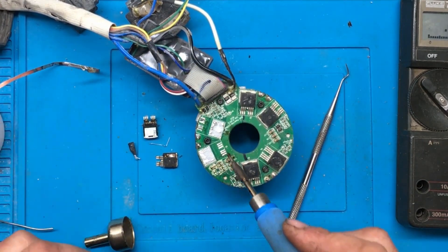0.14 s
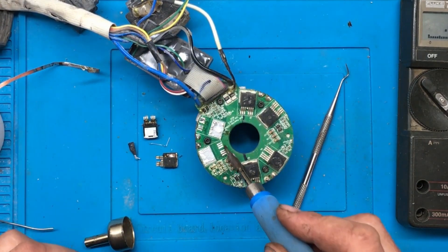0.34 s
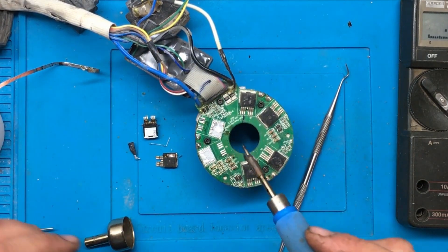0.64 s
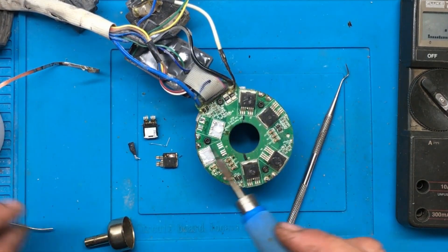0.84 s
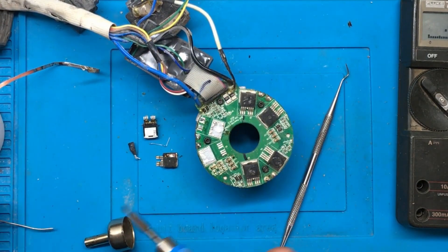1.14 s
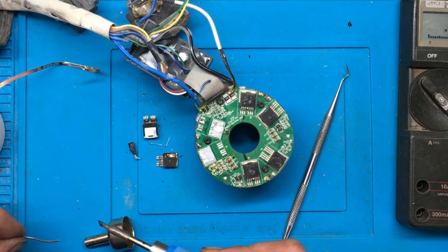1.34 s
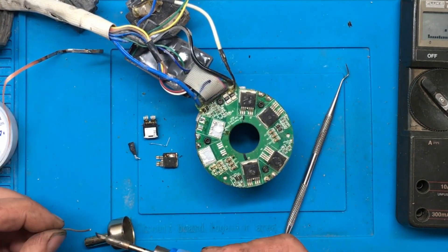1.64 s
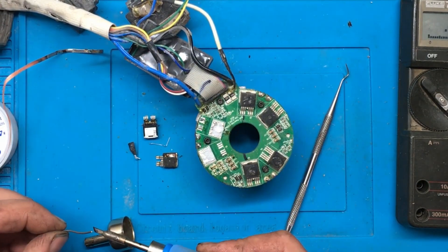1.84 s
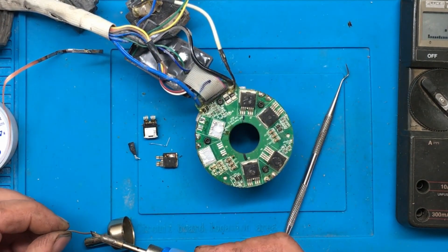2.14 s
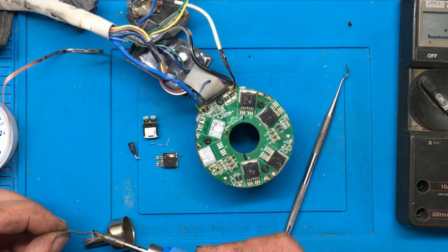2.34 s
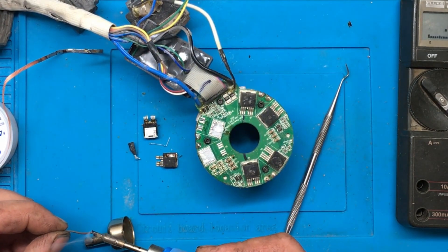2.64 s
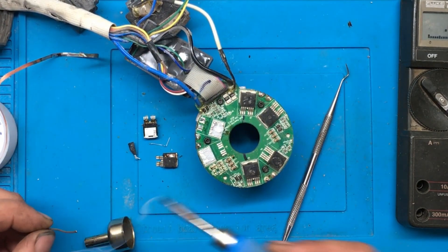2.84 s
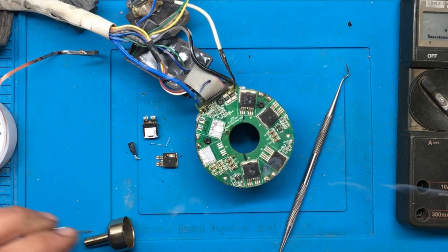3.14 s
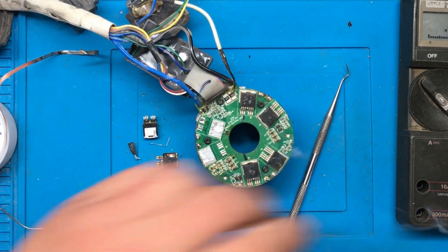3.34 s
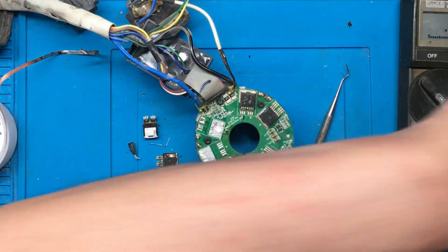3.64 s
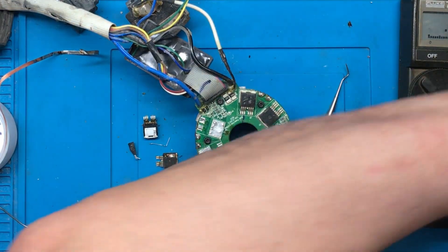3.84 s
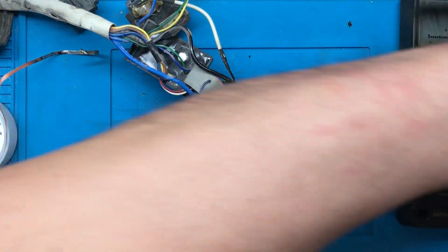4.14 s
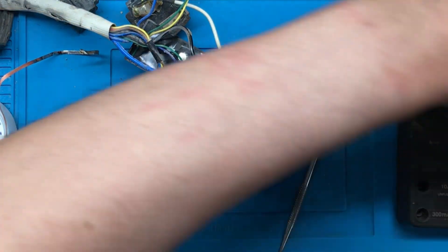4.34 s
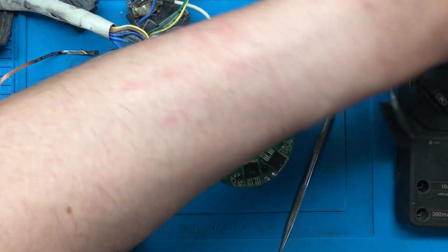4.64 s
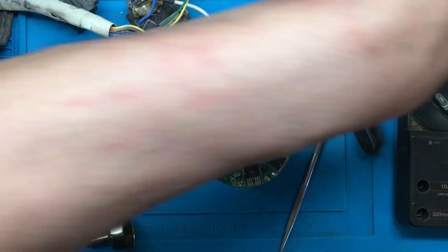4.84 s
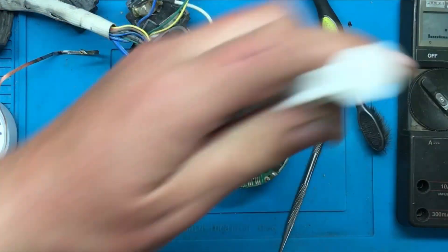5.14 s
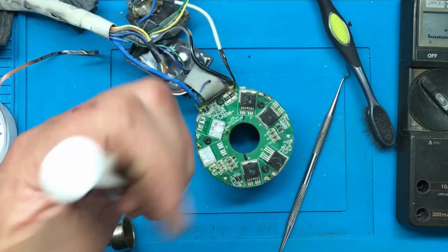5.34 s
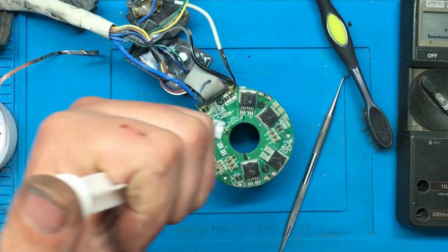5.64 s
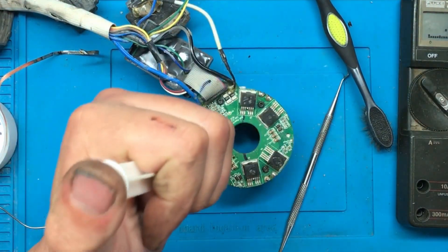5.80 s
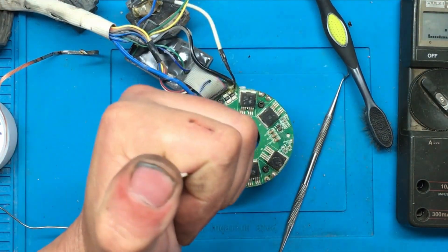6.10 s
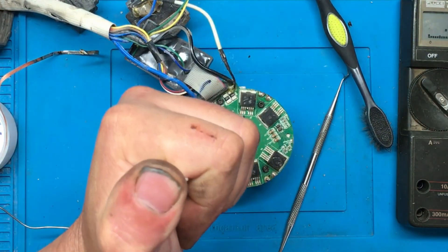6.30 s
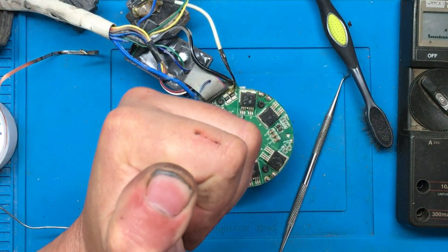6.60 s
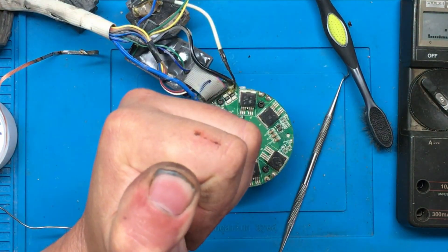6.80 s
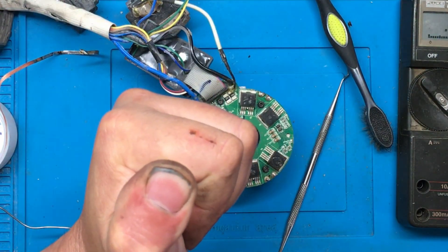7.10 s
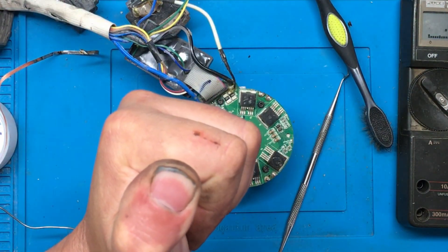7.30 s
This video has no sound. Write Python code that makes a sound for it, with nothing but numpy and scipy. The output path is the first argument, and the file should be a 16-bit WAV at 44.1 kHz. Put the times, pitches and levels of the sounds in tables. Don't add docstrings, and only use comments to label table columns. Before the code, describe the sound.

A small quiet room holds a faint low hum and soft hiss, with tiny flickering losses of treble. Around 1.3 to 1.6 seconds, faint muted metal taps and a light scrape come from a holder; another barely heard tick follows near 2.1. At 2.9 to 3.1 an iron touches metal and drops in with a crisp double clink. At 3.85 a small tool is picked up in a bright, quick clatter. From 4.0 to 4.35 loose plastic parts jostle lightly. A snap at 4.5 leads to the loudest hard crack at 4.56, a clack at 4.67 and hollow knocks around 4.85 to 4.95, with bench thumps and skin or plastic sliding over the mat. At 5.24 to 5.4 a brush lands and rattles woodily. Faint thin squeaks last to 6.4, then tiny clicks until 7.1. Close microphone, short echoes.

```python
import sys
import numpy as np
from scipy import signal
from scipy.io import wavfile
from scipy.ndimage import uniform_filter1d

SR = 44100
rng = np.random.default_rng(int(sys.argv[2]) if len(sys.argv) > 2 else 0)


def unload_wav(signal):
    wavfile.write(
        sys.argv[1],
        SR,
        np.round(np.clip(np.atleast_2d(signal).T, -1, 1) * 32767).astype(np.int16),
    )


def voltage_ratio(level):
    return 10 ** (np.asarray(level, float) / 20)


N = 328986


def evened(x):
    return x / np.sqrt(np.mean(x ** 2) + 1e-20)


def peaked(x):
    return x / abs(x).max()


def read(points, hz):
    f, value = np.transpose(points)
    return np.interp(np.log(hz + 1), np.log(f + 1), value)


def add(mix, s, sound):
    part = mix[round(s * SR):][:len(sound)]
    part += sound[:len(part)]


def coloured(x, colour):
    hz = abs(np.fft.fftfreq(4096, 1 / SR))
    log_gain = np.log(voltage_ratio(np.maximum(colour(hz), -100)))
    taps = np.fft.ifft(np.exp(np.conj(signal.hilbert(log_gain)))).real[:1024]
    return signal.oaconvolve(x, taps)[:len(x)]


def resonate(x, hz, width):
    turn = np.exp(2j * np.pi * np.cumsum(hz * np.ones(len(x))) / SR)
    r = np.exp(-np.pi * width / SR)
    return 2 * (turn * signal.lfilter([1 - r], [1, -r], x / turn)).real


def narrow_noise(hz, width):
    return evened(resonate(rng.standard_normal(N), hz, width))


def ringing(modes, strike, cycles, size):
    hz, db, t60 = np.transpose(modes)[:, :, None]
    t = np.arange(size) / SR
    fall_db = 60 * t / np.clip(t60, .005, cycles / hz)
    return (voltage_ratio(db + strike[:len(hz), None] - fall_db) * np.sin(2 * np.pi * hz * t)).sum(0)


def contact(contact_ms, rise_ms):
    t = np.arange(4000) / SR
    fade = np.exp(-t * 1000 / contact_ms * 2) + 0.23 * np.exp(-t / 0.00024)
    push = rng.standard_normal(4000) * fade * np.minimum(t * 1000 / rise_ms, 1)
    chance = uniform_filter1d(abs(np.fft.fft(push, 4096)) ** 2, size=15, mode="wrap")
    even_share = .85
    return coloured(push, lambda hz: -even_share * 10 * np.log10(chance / chance.mean() + .03))


# pitch in Hz, level in dB, t60 in seconds.
BENCH_MODES = [(77, -10.5, 0.33), (147.7, 2, 0.098), (269, -6.5, 0.17), (359.4, -3.5, 0.052),
               (418.6, -4.5, 0.16), (592, -12, .08), (636, -10.5, .07), (818, -6.5, .06)]


def bench_boom():
    soft_start = np.minimum(np.arange(9000) / 150, 1)
    return peaked(ringing(BENCH_MODES, 3 * rng.standard_normal(12), cycles=37.0, size=9000) * soft_start)


def knocks(rows, body, contact_ms, rise_ms):
    out, t = np.zeros(N), np.arange(4000) / SR
    colour, modes = body
    treble = signal.butter(3, 5000, "high", fs=SR, output="sos")
    middle = signal.butter(4, 5300, fs=SR, output="sos")
    for s, knock_db, tick_db, boom_db, hz in rows:
        push = contact(contact_ms, rise_ms)
        modes_ring = ringing(modes, 1.5 * rng.standard_normal(12), cycles=40., size=4000)
        rings = signal.oaconvolve(push, modes_ring)[:4000]
        crack = coloured(push, lambda f: read(colour, f))
        sound = peaked(crack) + 0.33 * peaked(rings)
        tick = signal.sosfilt(treble, sound)
        pitched = peaked(resonate(push, hz, 0.15 * hz))
        knock = signal.sosfilt(middle, peaked(sound - tick) + 0.6 * pitched)
        tick = tick * (0.39 + np.exp(-t / 0.0026))
        add(out, s, voltage_ratio(knock_db) * peaked(knock) + voltage_ratio(tick_db) * peaked(tick))
        add(out, s, voltage_ratio(boom_db) * bench_boom())
    return out


# start in seconds, knock in dB, treble tick in dB,
# bench boom in dB, knock pitch in Hz. All blow tables below have these columns.
HOLDER_BLOWS = [(1.3013, -35.5, -45, -44, 1630), (1.3693, -35, -49, -44.5, 1670),
                (1.4178, -37, -46, -50, 1440), (1.4302, -29, -24, -56, 3300), (1.4984, -51, -49, -69, 1650),
                (1.522, -60, -54, -75, 4300), (1.5398, -52, -55, -50, 3460), (1.5618, -46, -49, -57, 3400),
                (2.0934, -59, -47.5, -74, 4927)]
# crack colour (Hz, dB), then ringing modes (Hz, dB, t60 in seconds). All bodies below are alike.
HOLDER_BODY = [(350, -15), (600, -28), (1420, 0), (6520, -17), (7590, -20), (9740, -18.5), (14200, -23),
               (16500, -36)], [(2400, -10, 5.0), (3600, -24, 5.0), (6660, -7, 0.088), (9100, 3, 0.72)]
# (s, dB, dB, dB, Hz).
TOUCH_BLOWS = [(2.9261, -27, -20, -46.5, 3300), (2.939, -35, -50, -57, 3300),
               (3.0636, -39.5, -48, -49, 4170), (3.0745, -51, -56, -62, 3600)]
# (Hz, dB, s).
TOUCH_BODY = ([(290, -40), (800, -13), (1350, 10), (2100, -9), (3300, -6), (4700, -15), (5700, -6.5),
              (7000, -21), (16500, -32)], [(1300, -8, .03), (2560, -10, .03), (3320, -3, .05),
              (4420, -7, .03), (5660, -1, .03), (6966, -12, .03)])
# (s, dB, dB, dB, Hz).
IRON_BLOWS = [
    (3.0863, -17, -14.5, -36, 4000),
    (3.0888, -21, -32, -52, 1300),
    (3.0994, -22, -42, -51, 3160),
    (3.6563, -65, -57, -56, 850),
]
# (Hz, dB, s).
IRON_BODY = ([(290, -61), (600, -22), (980, -11), (1350, 5), (2000, -12), (3200, -10), (4400, -11.5),
             (5900, -15.5), (7400, -22), (10000, -28), (15100, -48), (16500, -46)], [(1500.4, -24, .05),
             (3200, -15, .04), (5400, -2, .02), (6000, 3, .04), (1300, 2, .05), (3080, -10, .04),
             (7504, -8, .03)])
# (s, dB, dB, dB, Hz).
PICK_BLOWS = [(3.8371, -47, -32, -65, 3254), (3.8427, -33.5, -24.5, -31.5, 1040),
              (3.8588, -21, -12, -27.5, 2380), (3.8651, -15, -21, -31.5, 1150),
              (3.8717, -16, -15, -66, 4350), (3.8777, -16.5, -16, -37, 620), (3.883, -22.5, -40, -36, 815),
              (3.9095, -37, -31, -58, 2400)]
# (Hz, dB, s).
PICK_BODY = [(180, -11), (300, 1), (1150, -7), (3140, 0), (3530, -16), (4390, -0.5), (4930, -20),
             (6560, -1), (14000, -24), (16500, -47)], [(950, 3, 5.0), (1200, 12.5, 0.18), (2470, 13, 0.08),
             (3080, 2, 0.08), (4500, 7, .08), (6470, 5, 0.071), (5750, -6.5, 0.1), (8086, 6, 0.092),
             (8603, 9, .08), (9000, 12, 0.056)]
# (s, dB, dB, dB, Hz).
PARTS_BLOWS = [(4.0152, -35, -25, -53, 1200), (4.0385, -31.5, -33, -39, 1200), (4.044, -33, -42, -50, 2950),
               (4.0732, -34.5, -38, -65, 2700), (4.0906, -34, -33, -39, 3400),
               (4.1411, -48, -39.5, -55, 1910), (4.1742, -57, -51, -68, 3500),
               (4.2009, -37, -42, -50.5, 1158), (4.2149, -41, -40, -54, 3200),
               (4.2268, -37, -40, -44, 1464), (4.2466, -34, -32.5, -77, 3140),
               (4.2595, -38, -36, -54, 3220), (4.274, -47.5, -34.5, -43, 945),
               (4.282, -49.5, -36.5, -59, 1890), (4.3053, -52.5, -38, -52.5, 860),
               (4.3262, -47.5, -51, -68, 3826)]
# (Hz, dB, s).
PARTS_BODY = [(180, -33.5), (300, -20.5), (531, -8.5), (1000, 3.5), (2060, -13.5), (3360, -4.5),
              (4900, -29), (5600, -19), (7600, -20), (9650, -20.5), (12300, -20), (15200, -26),
              (16500, -51.5)], [(3140, -4, 0.06), (5600, -3, 0.073), (7600, -6, 0.02), (12200, -3, 0.012)]
# (s, dB, dB, dB, Hz).
SNAP_BLOWS = [(4.4146, -48, -57, -48.5, 1779), (4.4878, -23.5, -19, -36.5, 2007),
              (4.4915, -23.5, -28, -50, 3750), (4.5131, -32.5, -41, -47.5, 2882)]
# (Hz, dB, s).
SNAP_BODY = [(290, -44.5), (500, -4), (1980, -0.5), (3070, -12.5), (3770, -6.5), (5120, -22), (12000, -18),
             (16500, -38)], [(3750, -4, .03), (11930, -4.5, .01)]
# (s, dB, dB, dB, Hz).
CAP_BLOWS = [
    (4.5429, -34, -55, -27, 501),
    (4.5528, -8, -45, -24, 1600),
    (4.5581, 3, -9, -27, 3050),
    (4.5635, -13, -30.5, -39, 1450),
    (4.5855, -24.5, -41, -42, 3050),
    (4.6449, -32, -48, -37.5, 2613),
]
# (Hz, dB, s).
CAP_BODY = [(180, -13), (400, -5.5), (800, -25.5), (1600, 1.5), (2200, -7), (3000, -7.5), (5200, -24),
            (14000, -25.5), (16500, -47)], [(1410, -5.5, .04), (1520, -6, .04), (1740, 1, .06),
            (2630, -5.5, .05), (3100, -2.5, .05), (4200, -9, .02)]
# (s, dB, dB, dB, Hz).
LID_BLOWS = [(4.6654, -6, -8, -27, 2028), (4.6684, -5, -25.5, -49, 1500), (4.683, -24, -36, -50.5, 3100),
             (4.7518, -31, -31, -26, 2910), (4.7555, -35.5, -32, -48, 4300)]
# (Hz, dB, s).
LID_BODY = [(300, -26), (700, -15.5), (1400, -3), (2100, 0.5), (3700, -7.5), (6000, -16.5), (9000, -20.5),
            (14000, -35), (16500, -48.5)], [(1500, -3, .03), (1930, 2, .05), (2630, -2.5, .03),
            (3112, -9, .04), (3700, -9, .03)]
# (s, dB, dB, dB, Hz).
TUBE_BLOWS = [(4.8485, -33, -41, -39, 1150), (4.855, -11.5, -4, -60, 2100),
              (4.8665, -14.5, -14, -25.5, 1087), (4.8824, -23, -38, -55, 1080),
              (4.9235, -21.5, -40, -26, 1980), (4.9538, -36, -23, -34.5, 1120),
              (4.9612, -36, -27, -77, 1020)]
# (Hz, dB, s).
TUBE_BODY = [(180, -32), (300, 9.5), (406, -33), (617, 3.5), (1430, -4), (1960, 0), (3970, -9.5),
             (8730, -8), (12400, -10), (16500, -35.5)], [(970, -10, 0.16), (2080, 9, 0.1),
             (3350, 10.5, 0.047), (5577, -34, 0.74), (7364, -22.5, 0.095)]
# (s, dB, dB, dB, Hz).
BRUSH_BLOWS = [(5.2428, -15, -22, -55, 2900), (5.2445, -9, -18.5, -24, 1920),
               (5.2487, -21.5, -42.5, -46, 804), (5.2567, -28, -50, -44, 614), (5.2717, -27, -48, -45, 700),
               (5.3121, -27, -49, -23.5, 3750), (5.3176, -16, -32.5, -47, 780),
               (5.3215, -21, -43, -52, 2400), (5.3325, -23, -40, -42, 1900),
               (5.3345, -15.5, -40, -20.5, 628), (5.3445, -28, -50, -47, 2300),
               (5.3608, -29, -49, -24.5, 605), (5.3929, -28.5, -50, -34, 604)]
# (Hz, dB, s).
BRUSH_BODY = [(180, -27), (300, -3), (531, -1.5), (800, -8.5), (1100, -17), (1900, -8), (3100, -14.5),
              (4930, -35.5), (13300, -38), (16500, -71.5)], [(400, -6, 0.1), (499, -11, .1), (570, -2, .1),
              (662, -19, .1), (850, -2, .07), (1940, 1, .02), (3100, -3, .03)]
# (s, dB, dB, dB, Hz).
PLUNGER_BLOWS = [(6.5176, -47, -52, -66, 1190), (6.5858, -50, -49, -55.5, 1157),
                 (6.542, -54, -59, -73.5, 1500), (6.5565, -55, -58.5, -75.5, 1094),
                 (6.611, -54, -59.5, -75, 3500), (6.638, -53, -60, -75, 1250), (6.661, -54, -64, -75, 1200),
                 (6.691, -53, -62, -75, 1200), (6.7218, -51, -56, -77, 3500), (6.7547, -54, -56, -81, 1210),
                 (6.8191, -50.5, -55.5, -71.5, 3570), (7.0556, -45, -49.5, -70.5, 3460)]
CONTACT_MS = {"holder": 8.6, "touch": 2.5, "iron": 3.2, "pick": 8.9, "parts": 5, "snap": 9.5, "cap": 4.5,
              "lid": 2.4, "tube": 4.1, "brush": 4.3, "plunger": 3.2}
RISE_MS = {"holder": 1.3, "touch": 0.55, "iron": 0.63, "pick": 0.29, "parts": 1.1, "snap": .5, "cap": 0.72,
           "lid": .4, "tube": .3, "brush": 0.86, "plunger": 0.62}
WET_DB = {"holder": -2, "touch": -1, "iron": -2, "pick": -2.8, "parts": -4, "snap": -0.5, "cap": -3.5,
          "lid": -3.5, "tube": 1.5, "brush": -2, "plunger": -3.5}


def handled_objects():
    objects = {
        "holder": (HOLDER_BLOWS, HOLDER_BODY), "touch": (TOUCH_BLOWS, TOUCH_BODY),
        "iron": (IRON_BLOWS, IRON_BODY), "pick": (PICK_BLOWS, PICK_BODY),
        "parts": (PARTS_BLOWS, PARTS_BODY), "snap": (SNAP_BLOWS, SNAP_BODY),
        "cap": (CAP_BLOWS, CAP_BODY), "lid": (LID_BLOWS, LID_BODY),
        "tube": (TUBE_BLOWS, TUBE_BODY), "brush": (BRUSH_BLOWS, BRUSH_BODY),
        "plunger": (PLUNGER_BLOWS, HOLDER_BODY)}
    blows = np.zeros((2, N))
    for name, (rows, body) in objects.items():
        blows += knocks(rows, body, CONTACT_MS[name], RISE_MS[name]) * voltage_ratio([[0], [WET_DB[name]]])
    no_bass = signal.butter(3, 105, "high", fs=SR, output="sos")
    return signal.sosfilt(no_bass, blows)


# start in seconds, pitch in
# Hz, level in dB, t60 in seconds.
THUDS = [(3.474, 1084, -41, 0.016), (8.1, 62, -42.5, 0.55), (7.33, 114, -40.5, 0.12),
         (1.6, 120, -47.5, 0.18), (1.378, 134, -38, 0.13), (1.441, 341, -38, 0.075), (5, 290, -31, 0.07),
         (4.766, 320, -38.5, 0.18), (4.035, 69, -47, .4), (4, 61, -55, 0.28), (4.555, 148, -22, .17),
         (4.556, 500, -27, .06), (4.556, 910, -28, .06), (4.684, 145, -30, .25), (4.762, 140, -32, .25),
         (5.246, 148, -20, .15), (5.243, 820, -25, .07), (5.316, 436, -24, .12), (5.318, 571, -24, .12),
         (5.34, 148, -31, .4), (5.243, 290, -25, .07), (4.925, 400, -33, .15)]


def thuds():
    out, t = np.zeros(N), np.arange(6000) / SR
    for s, hz, db, t60 in THUDS:
        tone = np.sin(2 * np.pi * hz * t) * np.minimum(t / 0.0027, 1)
        add(out, s, voltage_ratio(db - 60 * t / t60) * tone)
    return out


def mat_grain():
    lumps = evened(uniform_filter1d(rng.standard_normal(N), 60))
    fine, coarse = rng.standard_normal((2, N))
    return fine * voltage_ratio(1.5 * lumps), coarse * voltage_ratio(4 * lumps)


def stroke(start, length):
    press_share, lift_share, edge_db = 0.15, 0.42, -15
    u = np.arange(0, length, 1 / SR) / length
    lack = 1 - np.clip(np.minimum(u / press_share, (1 - u) / lift_share), 0, 1)
    ends = np.clip(np.minimum(u, 1 - u) * length / 0.013, 0, 1)
    first = round(start * SR)
    return slice(first, first + len(u)), voltage_ratio(edge_db * lack) * ends


# start and length in seconds, scrape in dB, rumble through the bench in dB.
PLASTIC_WIPES = [(1.311, 0.11, -59.5, -54), (1.397, 0.27, -60.5, -61), (3.878, 0.12, -60, -46.5),
                 (3.995, 0.18, -54.5, -52), (4.15, 0.26, -58.5, -59), (4.706, 0.11, -43.5, -40.5),
                 (4.754, 0.2, -51.5, -50), (4.93, 0.39, -59, -63), (5.235, 0.185, -50, -45),
                 (5.434, 0.22, -69, -60.5)]
# frequency in Hz, level in dB.
SCRAPE_COLOUR = [(410, -31.5), (700, -24), (1190, -2.5), (1320, -12), (2480, -9.5), (2720, -10.5),
                 (5000, -14), (6500, -37.5), (11000, -120)]
# frequency in Hz, level in dB.
RUMBLE_COLOUR = [(29, -48), (50, -15.5), (86, -8.5), (129, 15.5), (178, -4.5), (249, 4), (362, -0.5),
                 (591, -4.5), (800, -16.5), (1100, -26.5), (1430, -58.5), (2420, -120)]


def plastic_drags(coarse):
    out = np.zeros(N)
    scrape = evened(coloured(coarse, lambda hz: read(SCRAPE_COLOUR, hz)))
    rumble = evened(coloured(coarse[::-1], lambda hz: read(RUMBLE_COLOUR, hz)))
    for start, length, scrape_db, rumble_db in PLASTIC_WIPES:
        part, press = stroke(start, length)
        add(out, start, press * (voltage_ratio(scrape_db) * scrape[part] + voltage_ratio(rumble_db) * rumble[part]))
    return out


# start and length in
# seconds, pitch and width in Hz, level in dB.
SINGING_PARTS = [(4.0, 0.25, 1050, 180, -57), (4.08, 0.09, 3300, 280, -56), (4.05, 0.26, 9600, 150, -63),
                 (4.18, .035, 11800, 2500, -59), (4.118, .03, 10500, 4000, -59),
                 (4.146, .016, 9000, 3000, -55), (4.272, .024, 5700, 400, -54),
                 (4.265, .05, 3500, 500, -58), (1.512, .03, 8500, 2500, -58),
                 (4.243, 0.035, 3230, 700, -50), (4.71, 0.13, 290, 29, -37.5), (5.248, 0.17, 570, 230, -39),
                 (5.245, 0.059, 930, 200, -45), (5.31, 0.1, 780, 210, -42.5),
                 (5.325, 0.091, 2100, 1300, -51), (5.242, 0.02, 3230, 330, -28), (5.245, .18, 151, 23, -37),
                 (4.565, .095, 2750, 500, -42.5), (5.1, .06, 13000, 2700, -52), (4.6, .05, 8000, 800, -57),
                 (3.09, 0.036, 6200, 700, -53), (1.435, .15, 3800, 2000, -56), (5.5, .11, 2140, 350, -59),
                 (5.5, 0.11, 8950, 910, -58), (5.76, 0.082, 1600, 120, -68), (6.22, .08, 2200, 100, -77),
                 (3.4, 0.019, 3000, 2800, -66), (1.45, 0.027, 8300, 2000, -62)]


def singing_parts(coarse):
    out = np.zeros(N)
    for start, length, hz, width, db in SINGING_PARTS:
        part, press = stroke(start, length)
        tone = evened(resonate(resonate(coarse[part], hz, width), hz, width))
        add(out, start, voltage_ratio(db) * press * tone)
    return out


# start and length in seconds, hiss in dB, squeal share from 0 to 1.
SKIN_SLIDES = [(1.414, 0.22, -60.5, 0.5), (3.64, 0.067, -61.5, 0.04), (4.077, 0.23, -59.5, 0.15),
               (4.288, 1, -63.5, 0.1), (4.705, 0.18, -59, 0.6), (4.942, 0.49, -56.5, 0.22),
               (5.15, 0.12, -45, 0.22), (5.367, 0.11, -43, 0.7), (5.463, 0.17, -57.5, 0.3)]
# frequency in Hz, level in dB.
SKIN_COLOUR = [(2350, -10), (4000, -2.5), (4750, -18.5), (5440, -1.5), (8100, 0), (13800, -2.5),
               (16200, -9), (16500, -57)]


def skin_slides(fine):
    out = np.zeros(N)
    hiss = evened(coloured(fine, lambda hz: read(SKIN_COLOUR, hz)))
    squeal_hz, width = 8270, 1500
    squeal = evened(resonate(resonate(fine, squeal_hz, width), squeal_hz, width))
    for start, length, hiss_db, share in SKIN_SLIDES:
        part, press = stroke(start, length)
        add(out, start, voltage_ratio(hiss_db) * press * ((1 - share) * hiss[part] + share * squeal[part]))
    return out


# start and end in seconds, pitch in Hz.
SQUEAKS = [
    (5.58, 6.36, 3167),
    (5.7, 6.02, 5210),
    (5.6, 5.86, 1800),
]


def whine():
    out, t = np.zeros(N), np.arange(N) / SR
    for start, end, hz in SQUEAKS:
        tone = np.sqrt(2) * np.sin(2 * np.pi * hz * t) + 0.33 * narrow_noise(hz, 12.0)
        out += voltage_ratio(-81.5) * tone * np.clip(np.minimum(t - start, end - t) / 0.04, 0, 1)
    return out


# delay in ms, level in dB.
ECHOES = [(3.1, -13), (5.4, -25), (8.2, -26), (13.4, -16), (21, -28.5), (29, -29)]
# frequency in Hz, t60 in seconds.
ROOM_DECAY = [(120, 0.23), (400, 0.35), (1200, 0.36), (3000, 0.26), (6500, 0.3), (11000, 0.16),
              (16000, 0.41)]


def room_tail():
    taps = np.zeros(SR // 2)
    at = np.arange(120, len(taps) - 12, 12)
    at = at + rng.integers(0, 12, len(at))
    taps[at] = rng.choice([-1., 1.], len(at))
    hz, t, z = signal.stft(taps, SR, nperseg=256)
    decay = voltage_ratio(-60 * t / read(ROOM_DECAY, hz)[:, None])
    tail = signal.istft(z * decay, SR, nperseg=256)[1]
    tail *= 1 + 0.79 * np.exp(-np.arange(len(tail)) / SR / 0.0081)
    return tail / np.linalg.norm(tail)


def room(x):
    early = np.zeros(2000)
    for ms, db in ECHOES:
        early[round(ms * SR / 1000)] = voltage_ratio(db)
    out = signal.oaconvolve(x, early)[:N]
    turn = 2 * np.pi * 7 * np.arange(N) / SR
    for k in range(3):
        feed = np.sqrt(2 / 3) * np.cos(turn + k * np.pi / 3)
        out += voltage_ratio(-5.0) * signal.oaconvolve(x * feed, room_tail())[:N]
    return out


# frequency in Hz, level in dB per Hz.
AIR_COLOUR = [(12, -68), (20, -19), (34, -2.5), (53, 3), (94, -5), (165, -7), (342, -10), (372, -12),
              (404, -13.5), (479, -13.5), (1240, -18), (4930, -25), (9900, -27), (10500, -29.5),
              (11200, -27.3), (12800, -27.5), (15700, -29.5), (16500, -40)]
# pitch in Hz, width in Hz, level in dB.
FAN_TONES = [
    (402, 11, -76.5),
    (170, 12, -77),
]


def air():
    frames, hz = N // 512 + 5, np.fft.rfftfreq(2048, 1 / SR)
    a, b, patches = rng.standard_normal((frames, 1025, 3)).T
    patches = evened(uniform_filter1d(uniform_filter1d(patches, 30, 0), 6, 1))
    z = (a + 1j * b) * voltage_ratio(read(AIR_COLOUR, hz)[:, None] + 1.1 * patches)
    wash = voltage_ratio(-62) * evened(signal.istft(z, nperseg=2048, noverlap=1536)[1][:N])
    fan = sum(voltage_ratio(db) * narrow_noise(f, width) for f, width, db in FAN_TONES)
    return wash + fan


def scene():
    near, far = handled_objects()
    fine, coarse = mat_grain()
    rubbing = plastic_drags(coarse) + singing_parts(coarse) + skin_slides(fine)
    return (near + room(far) + thuds() + rubbing + whine() + air())[None]


SHORT_DROPOUTS = [.232, .446, 1.106, 1.171, 1.472, 1.981, 2.302, 2.408, 2.599, 2.901, 3.197, 3.39, 3.751,
                  4.412, 4.943, 5.118, 6.355, 6.547, 6.61, 7.036, 7.081]
# time in seconds, length in ms, lowest lost frequency in Hz.
LONG_DROPOUTS = [(.03, 30, 2000), (.158, 30, 1700), (2.948, 20, 1700), (5.779, 46, 600)]
# time in seconds, length in ms, from Hz, to Hz.
SILENT_BANDS = [(3.882, 30, 1400, 2250), (3.882, 30, 3400, 4100), (3.882, 30, 4900, 5450),
                (3.882, 30, 7000, 7950), (3.882, 30, 9300, 10200), (3.882, 30, 6000, 6350),
                (3.882, 30, 8200, 8480), (2.94, 22, 7300, 16000), (4.797, 16, 9200, 16000),
                (4.797, 18, 5000, 6100), (4.79, 26, 2300, 2700), (5.439, 14, 2600, 5600),
                (5.437, 16, 1500, 2600)]


def treble_dropouts(x):
    hz, t, z = signal.stft(x, SR, nperseg=1024, noverlap=896)
    short = [(s, 20, rng.uniform(2200, 4400)) for s in SHORT_DROPOUTS]
    for s, ms, lowest_hz in short + LONG_DROPOUTS:
        kept = np.repeat(rng.random(129) < .3, 4)[:len(hz)] | (hz < lowest_hz)
        z[:, :, abs(t - s) < ms / 2000] *= np.where(kept, 1.3, .05)[:, None]
    for s, ms, low_hz, high_hz in SILENT_BANDS:
        lost = (hz > low_hz) & (hz < high_hz)
        z[:, :, abs(t - s) < ms / 2000] *= np.where(lost, .05, 1)[:, None]
    top = hz > 15790
    loud = abs(z[:, top]).max(1, keepdims=True) > voltage_ratio(-72)
    z[:, top] *= loud * (hz[top, None] < 16700)
    return signal.istft(z, SR, nperseg=1024, noverlap=896)[1][:, :N]


def low_pass(x):
    return signal.sosfilt(signal.butter(12, 17000, fs=SR, output="sos"), x)


def record(dry):
    thin = signal.sosfilt(signal.butter(2, 45, "high", fs=SR, output="sos"), dry)
    rounded = .95 * np.tanh(thin / .95)
    dull = signal.oaconvolve(rounded, signal.firwin(255, 16800, fs=SR)[None], "same")
    mix = treble_dropouts(dull)
    return low_pass(mix)


dry = scene()
out = record(dry)
unload_wav(out)
```